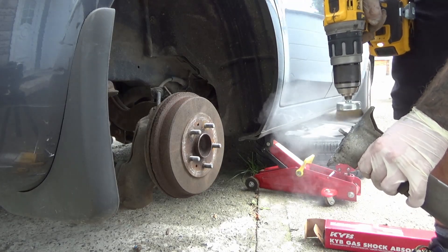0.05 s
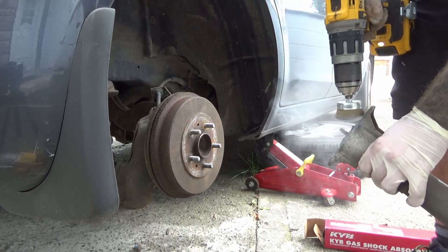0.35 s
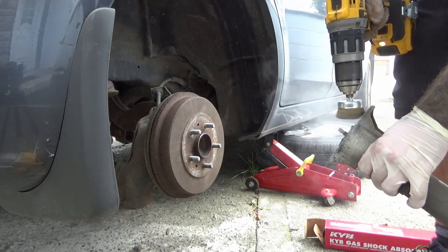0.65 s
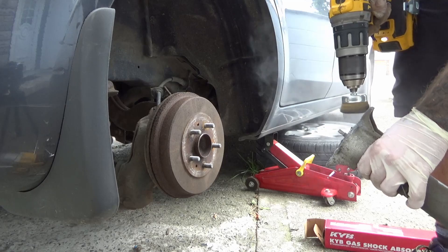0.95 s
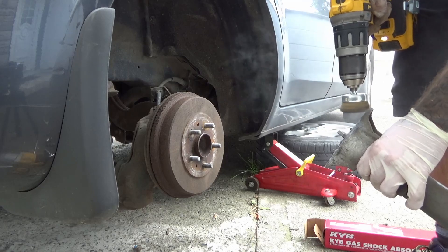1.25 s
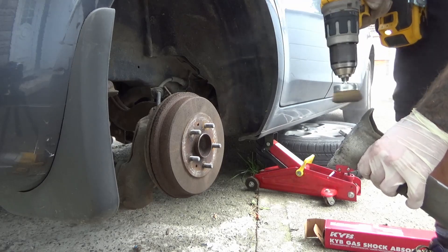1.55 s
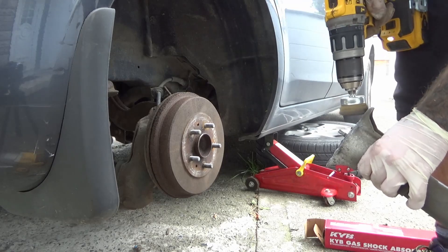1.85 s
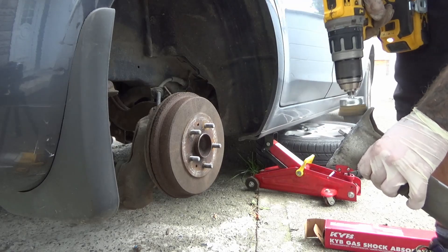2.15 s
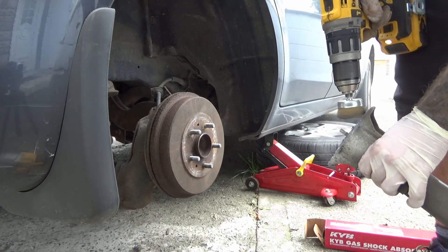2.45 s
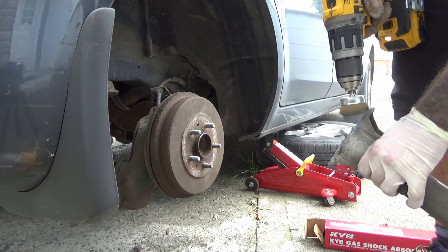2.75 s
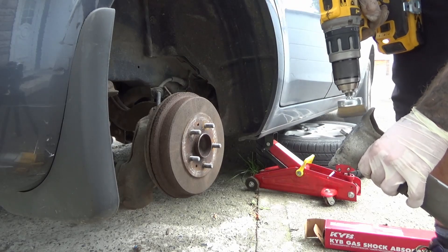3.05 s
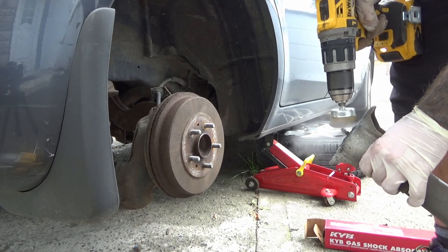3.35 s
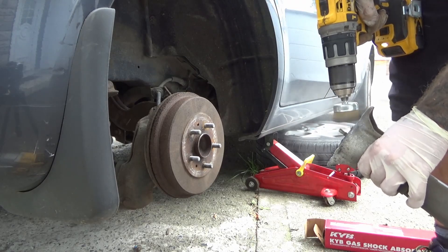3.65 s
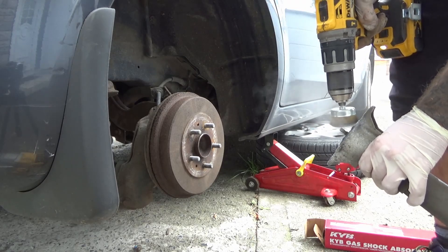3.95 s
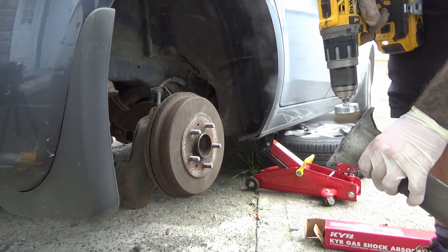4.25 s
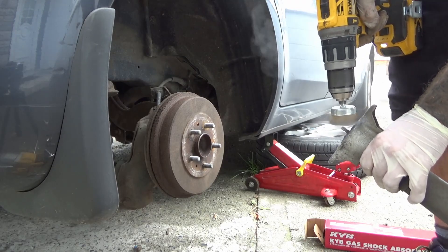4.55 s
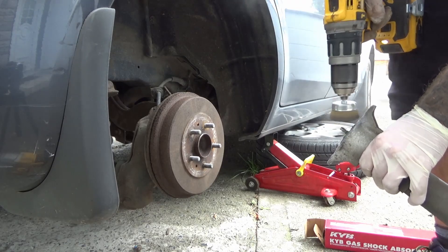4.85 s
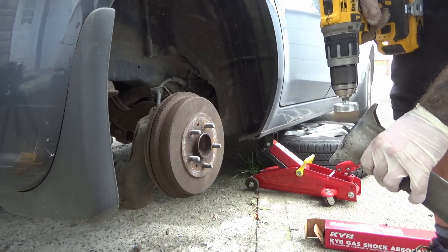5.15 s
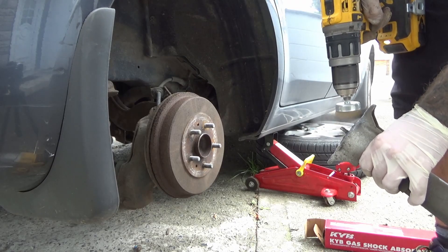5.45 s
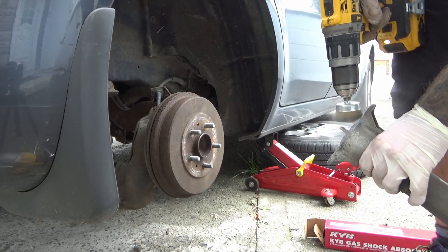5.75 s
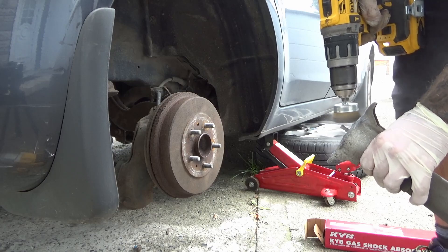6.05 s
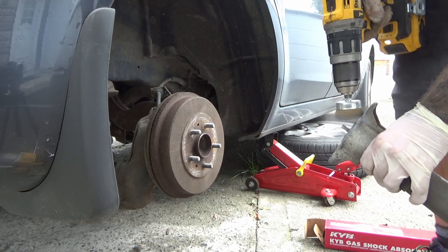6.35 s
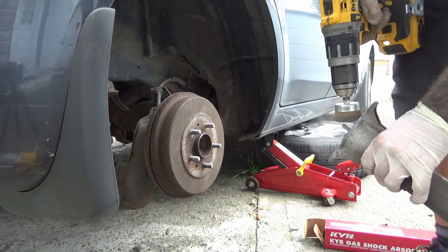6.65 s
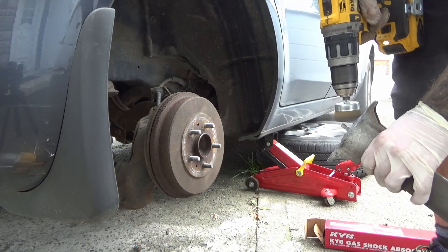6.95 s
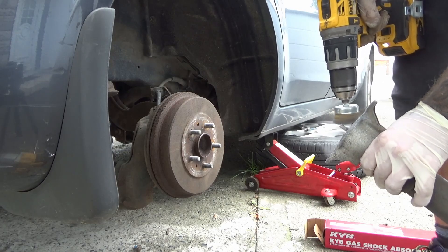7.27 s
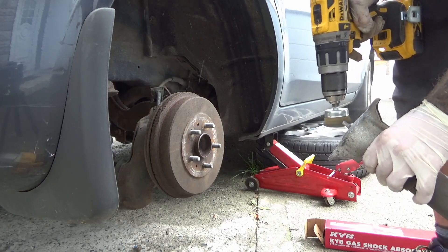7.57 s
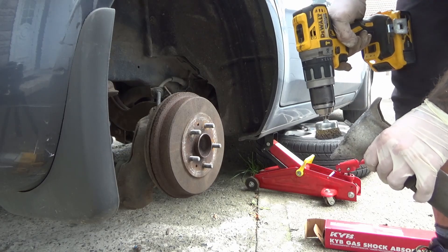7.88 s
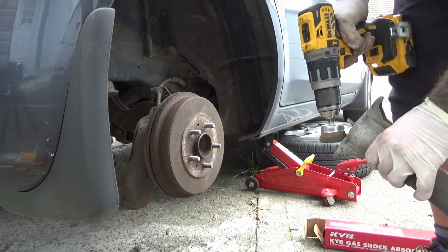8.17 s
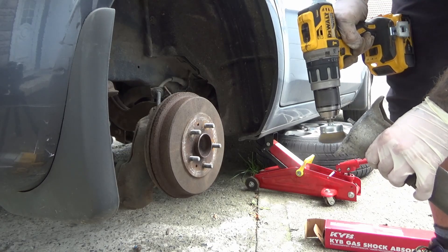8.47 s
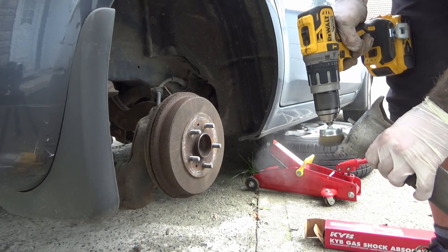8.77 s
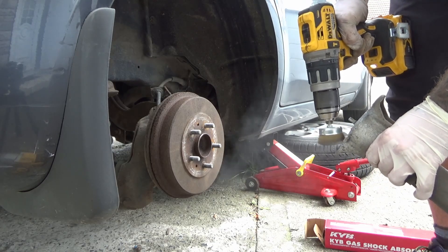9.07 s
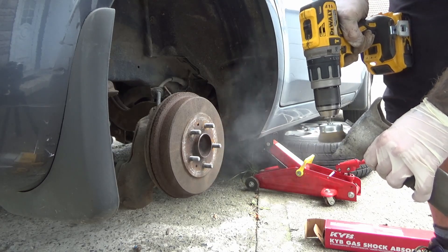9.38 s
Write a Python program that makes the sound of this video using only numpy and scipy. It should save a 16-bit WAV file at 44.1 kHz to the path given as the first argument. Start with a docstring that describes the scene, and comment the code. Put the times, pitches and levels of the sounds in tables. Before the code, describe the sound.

From the start, a cordless drill spins a wire brush against a steel strut, close by and outdoors. The sound is a dense, harsh scrubbing hiss with a metallic ring, topped by a high gear whine and thinner motor tones. The whine flutters, swelling as pressure eases and weakening as the brush presses harder, over a very faint low hum. Around 1.6 seconds the pressure lightens and the hiss shifts slightly in colour, then the scrubbing carries on steadily. At about 7.6 seconds the drill brakes with a short gear rattle and the hiss dies away, leaving a faint outdoor rumble. Small trigger clicks come from about 8.1 seconds, then a sharp clack at 8.2 as the motor quickly spins up with a brief chatter. The brush bites again at once, and the hiss and whine continue, slightly changed in tone, until about 9.6 seconds.

```python
"""Wire brush on a steel strut

A cordless drill scrubs a rusty strut with a wire cup brush, outdoors beside a car. Thousands of
wire impacts a second excite the resonances of the metal; the gears whine at their meshing
frequency and waver under the load. The drill brakes, is turned in the hand, and starts again
with a clack half a second later."""
import sys
import numpy as np
from scipy import signal
from scipy.fft import rfft, irfft, next_fast_len
from scipy.io import wavfile
from scipy.ndimage import uniform_filter1d

SR = 44100
rng = np.random.default_rng(int(sys.argv[2]) if len(sys.argv) > 2 else 0)


def generate_wav(signal):
    """Clip the signal to [-1, 1] and save it as 16-bit WAV at the path in sys.argv[1]."""
    frames = np.transpose(np.atleast_2d(signal))
    scaled = np.clip(frames, -1, 1) * 32767
    pcm = np.round(scaled).astype(np.int16)
    wavfile.write(sys.argv[1], SR, pcm)


N = 424241
T = np.arange(N) / SR
HZ = np.fft.rfftfreq(2 * next_fast_len(N // 2 + 2048), 1 / SR)

GEARING = 15.2  # shaft turns per turn of the brush
STALL_S, RESTART_S, BITE_S = 7.657, 8.205, 8.238  # the brush stalls, the motor restarts, the wires bite
# Force of the brush on the metal. Each row: time in seconds, pressure from 0 to 1.
PRESSURE = [(0, .55), (.65, .42), (.95, .85), (1.4, .85), (1.58, .05), (1.72, .2), (1.95, .8), (2.7, .9),
            (2.9, .55), (3.1, .9), (3.9, .45), (4.4, .88), (4.95, .42), (5.1, .95), (5.5, .72), (7.4, .75),
            (7.58, .25), (9.62, .33)]
# The two times, in seconds, at which the hand changes its hold on the drill.
HOLD_CHANGES = [1.65, 8.0]


def amp(db):
    """Amplitude grows tenfold for every 20 dB."""
    return 10 ** (np.asarray(db) / 20)


def unit(x):
    """Normalisation to an rms of 1."""
    return x / np.sqrt(np.mean(x ** 2) + 1e-20)


def curve(rows):
    """Linear interpolation of (seconds, value) rows at every sample."""
    return np.interp(T, *np.transpose(rows))


def ramp(start, length):
    """Linear rise from 0 to 1 over length seconds."""
    return np.clip((T - start) / length, 0, 1)


def decay(start, t60):
    """Exponential decay: 1 until start, then 60 dB down every t60 seconds."""
    return amp(-60 * np.maximum(T - start, 0) / t60)


def spectrum(points):
    """Interpolation of (Hz, value) rows on a logarithmic frequency axis."""
    hz, value = np.transpose(points)
    return np.interp(np.log(HZ + 1), np.log(hz + 1), value)


def shape(x, gain):
    """Filtering as multiplication of the spectrum by a gain."""
    size = 2 * (len(HZ) - 1)
    return irfft(rfft(x, size) * gain, size)[..., :N]


def bell(hz, width):
    """Lorentzian resonance curve, 1 at its centre."""
    return 1 / (1 + (2 * (HZ - hz) / width) ** 2)


def wander(hz, width):
    """Band-limited noise: random motion of rms 1 at rates around hz."""
    return unit(shape(rng.standard_normal(N), bell(hz, width)))


def coloured_noise(colour):
    """Spectral shaping of two independent white noises by (Hz, dB) rows, to rms 1."""
    return unit(shape(rng.standard_normal((2, N)), amp(spectrum(colour))))


def ears(pair):
    """Interaural coherence: two unrelated signals mix into a nearly alike left and right."""
    # Likeness of the two ears. Each row: frequency in Hz, coherence from 0 to 1.
    likeness = [(400, 1), (560, .96), (1400, .94), (2800, .9), (5500, .93), (9000, .87), (11000, .96),
                (13000, 1)]
    # Interaural level difference. Each row: frequency in Hz, left minus right in dB.
    balance = [(350, 0), (700, -.7), (1400, -1.1), (2800, -3.1), (5500, -2.1), (9000, -.7), (12000, 0)]
    coherence, lean_db = np.clip(spectrum(likeness), 0, 1), spectrum(balance)
    mid = shape(pair[0], np.sqrt((1 + coherence) / 2))
    side = shape(pair[1], np.sqrt((1 - coherence) / 2))
    return np.array([shape(mid + side, amp(lean_db / 2)), shape(mid - side, amp(-lean_db / 2))])


def air(level_db=-61.5, pause_rise_db=11.5, fade_s=.073):
    """Ambient noise: a low outdoor rumble; the background rises while the drill rests."""
    # Spectrum of the air. Each row: frequency in Hz, relative level in dB.
    colour = [(15, -33), (25, -3.5), (103, -9), (139, -7), (243, -13), (286, -13.5), (309, -15.5),
              (383, -14.5), (529, -15.5), (3730, -30.5), (15000, -50)]
    resting = ramp(STALL_S, fade_s) - ramp(BITE_S, fade_s)
    return coloured_noise(colour) * amp(level_db + pause_rise_db * resting)


def bumps(level_db=-8, rise_s=.015, t60=.25):
    """Damped low resonance: the strut jolts softly in the hand that holds it."""
    # Dull jolts. Each row: start in seconds, relative level in dB.
    jolts = [(4.756, -45), (4.907, -43)]
    thud = unit(shape(rng.standard_normal(N), bell(hz=215, width=70) ** 2))
    return thud * sum(amp(db + level_db) * ramp(s, rise_s) * decay(s + rise_s, t60) for s, db in jolts)


def clicks():
    """Impact transients: the trigger clicks and the gears clack as they take up slack."""
    # Each row: start in seconds, level in dB, t60 in seconds, knock relative to snap in dB.
    impacts = [(8.066, -57, 0.5, -12), (8.141, -52, .08, -12), (8.157, -41, .05, -13),
               (8.167, -37, 0.051, -6), (8.202, -36, .04, -15), (8.21, -33, 0.044, -18),
               (8.222, -23, 0.065, 2)]
    # Spectra of the bright snap and the duller knock. Each row: frequency in Hz, relative level in dB.
    snap_colour = [(300, -31), (1500, -10), (3050, 1), (4600, 1), (7200, -1), (10000, -9), (15000, -24)]
    knock_colour = [(100, -30), (400, -13), (1100, 4), (2800, -3), (5000, -16), (12000, -30)]
    snap, knock = coloured_noise(snap_colour), coloured_noise(knock_colour)
    return sum((T >= s) * amp(db) * decay(s, t60) * (snap + amp(knock_db) * knock)
               for s, db, t60, knock_db in impacts)


def rattle(chatter_db=3):
    """Backlash: loose teeth excite the modes of the gear case as the motor brakes or speeds up."""
    # Modes of the case. Each row: frequency in Hz, width in Hz, relative level in dB.
    case_modes = [(1100, 220, -7.5), (3800, 740, -2), (7100, 550, -6)]
    # Bursts of chatter. Each row: start in seconds, rise in seconds, peak in dB, t60 in seconds.
    bursts = [(7.5, .162, -22.5, .14), (8.195, 0.063, -19.5, .21)]
    response = sum(amp(db) * bell(hz, width) for hz, width, db in case_modes)
    chatter = rng.standard_normal((2, N)) * amp(chatter_db * wander(80, 150))
    level = sum(amp(db) * ramp(s, rise) ** 2 * decay(s + rise, t60) for s, rise, db, t60 in bursts)
    return unit(shape(chatter, response)) * level


def drag():
    """Friction: the snagging of the wires grows with pressure, up to a limit."""
    return np.minimum(.5 + curve(PRESSURE), 1.1)


def motor(brake_s=7.578, spin_up_s=.115, overshoot=.033, settle_s=.04, sway_depth=.0043):
    """Speed (1 = full) and its integral, the shaft turns, which waver under the drag of the load."""
    # Shaft speed under full trigger. Each row: time in seconds, rotation rate in Hz.
    shaft_hz = [(0, 410), (2.4, 409.2), (4, 409.3), (5.5, 410.4), (7.6, 410.2), (9.2, 409.7)]
    braking = 1 - ramp(brake_s, length=.125) ** 1.6  # slows ever faster to a halt
    excess = overshoot * np.exp(-np.maximum(T - RESTART_S - spin_up_s, 0) / settle_s)
    speed = braking + ramp(RESTART_S, spin_up_s) ** 1.35 * (1 + excess)
    sway = sway_depth * unit(wander(13, 14) + .9 * wander(33, 12))
    turns = np.cumsum(curve(shaft_hz) * speed * (1 + drag() * sway)) / SR
    return speed, turns


def shudder(speed, turns, waver_db=3.5, level_db=.3, restart_db=-6):
    """Rotating unbalance: the brush shakes the strut, less so in the grip after the restart."""
    # Harmonics of the shaking. Each row: multiple of the brush speed, relative level in dB.
    harmonics = [(1, -8), (3, -3.5), (5, -0.5), (9, -0.5)]
    # Strength of the shaking. Each row: time in seconds, relative level in dB.
    strength = [(0.0, -70), (0.14, -65), (1.08, -63), (1.54, -82), (2.09, -63), (5.63, -73), (7.2, -68.5)]
    phase = 2 * np.pi * turns / GEARING
    hum = sum(amp(db) * unit(amp(waver_db * wander(2, 8))) * np.sin(order * phase)
              for order, db in harmonics)
    level = amp(level_db + curve(strength) + restart_db * (T > RESTART_S))
    return np.sqrt(2) * hum * level * speed ** 2


def motor_tones(speed, turns, flutter_db=2):
    """Rotational harmonics: thin tones of the shaft that stand out only near full speed."""
    # Each row: multiple of the shaft speed, full-speed level in dB before the pause and after it.
    harmonics = [(1, -62, -66), (2, -57, -60), (4, -41, -44), (5, -46, -50), (8, -34.6, -30.5),
                 (9, -45, -42), (16, -42.5, -45)]
    tones = 0
    for order, before_db, after_db in harmonics:
        level = amp(np.where(T < HOLD_CHANGES[1], before_db, after_db))
        flutter = unit(amp(flutter_db * wander(5, 30)))
        tones += level * flutter * np.sin(2 * np.pi * order * turns)
    return np.sqrt(2) * tones * speed ** 4


def gear_whine(speed, turns, teeth=23, free_db=-21.9, pressed_db=-8.5, flutter_db=3.5):
    """Gear meshing: a tone at the tooth rate, which pressure weakens and sets fluttering."""
    flutter = amp(flutter_db * drag() * wander(16, 70))
    flutter /= np.sqrt(uniform_filter1d(flutter ** 2, size=SR // 4))  # keeps the mean power steady
    # the short waves reach the two ears with drifting differences of phase and level
    sides = np.array([[1], [-1]])
    drift_rad = .27 * wander(2, 15) * sides
    drift_db = .7 * wander(.5, 2) * sides
    mesh = np.sqrt(2) * np.sin(2 * np.pi * teeth * turns + drift_rad)
    level = amp(free_db + pressed_db * curve(PRESSURE) + drift_db)
    fade_in = np.interp(speed, (.62, .8), (0, 1))
    roughness = 1 + .2 * wander(100, 400)
    return level * fade_in * flutter * roughness * mesh


def wheel_arch(x, echo_db=-16, t60=.1):
    """Interference: dense short reflections from the car and the paving ripple the spectrum finely."""
    t = np.arange(SR // 10) / SR
    taps = rng.standard_normal(len(t)) * (t > .002) * amp(-60 * t / t60)
    echoes = signal.fftconvolve(x, taps[None] / np.linalg.norm(taps), axes=1)[:, :N]
    return x + amp(echo_db) * echoes


def wire_flicks(turns, flicks_per_s=12000, spread_db=2.5, wash=.76, snag_db=.26, patchy_db=.55):
    """Shot noise: wire tips strike at random over a wash of hiss, surging with each brush turn."""
    sizes = amp(spread_db * np.minimum(rng.exponential(1, (2, N)), 4)) * rng.choice([-1, 1], (2, N))
    strikes = rng.random((2, N)) < flicks_per_s / SR
    flicks = unit(sizes * strikes) + wash * rng.standard_normal((2, N))
    surge = .025 * np.sin(2 * np.pi * turns / GEARING)
    buzz = .036 * np.sin(2 * np.pi * turns * 3 / 4)
    flicks *= (1 + surge + buzz) * amp(snag_db * wander(60, 60))
    # as the contact point roams, broad regions of the spectrum swell and fade apart
    roaming = sum(shape(flicks, bell(hz, hz / 4)) * wander(1.5, 24)
                  for hz in np.geomspace(1000, 12000, num=8))
    return flicks + (amp(patchy_db) - 1) * roaming


def resonances(flicks, crossfade_s=.2):
    """Source and filter: strut, brush and wheel arch colour the flicks differently in each hold."""
    # Spectrum of one flick. Each row: frequency in Hz, relative level in dB.
    flick_colour = [(90, -37), (200, -26.5), (400, -23), (600, -14), (900, -4), (1500, -8), (3000, -3),
                    (4500, -2.5), (7000, -0.5), (8800, 1), (10000, -7), (12000, -11), (13700, -13),
                    (15500, -19.5)]
    # Narrow ringing tones in the scrubbing hiss, several of them from the drill's motor.
    # Each row: frequency in Hz, width in Hz, gain in dB.
    narrow_tones = [(305.5, 14, 8.5), (754, 16, 2.5), (1151, 20, 1.5), (3130, 30, 5), (6576, 36, 5)]
    # Peaks and hollows. Each row: frequency in Hz, width in Hz, gain in dB for each of three holds.
    body = [(791, 33.4, -17, -12.5, -15), (936, 56, -1.5, -3.5, -5.5), (1146, 120, 0.5, 1, 1.5),
            (1354, 52, -4.5, -6.5, -10), (1520, 256, 5.5, 6, 6.5), (1684, 66, -12.5, -9.5, 0),
            (1863, 160, 6, 6, 2), (2067, 138, 7, 7.5, 7.5), (2370, 74, -2, -5, 0),
            (2700, 195, -1, -1.5, 4.5), (2984, 150, 3.5, 3.5, 3), (3440, 450, 0.9, 2.5, 4.5),
            (4470, 430, -1.1, -0.5, 3.5), (4830, 880, 3, 3, -1.6), (5580, 650, -3, -4.5, -3.3),
            (6150, 350, 0, -1.6, 2), (7050, 400, 2.5, 1.5, 3.5), (7780, 320, -0.5, -0.5, -7.5),
            (7850, 380, -2.5, -1, 4), (8800, 350, -2.5, -2.5, -1.5), (11200, 3200, -0.5, -1, 1.5)]
    # Relative strength of the scrubbing in each hold, in dB.
    hold_db = [-1.13, -0.19, -0.04]
    steady_db = spectrum(flick_colour) + sum(db * bell(hz, width) for hz, width, db in narrow_tones)
    first, second = (np.clip((T - s) / crossfade_s + .5, 0, 1) for s in HOLD_CHANGES)
    ringing = 0
    for hold, share in enumerate([1 - first, first - second, second]):
        colour_db = steady_db + sum(dbs[hold] * bell(hz, width) for hz, width, *dbs in body)
        ringing += share * amp(hold_db[hold]) * unit(shape(flicks, amp(colour_db)))
    return ringing


def strut_ring(scrub, free_db=-.9, pressed_db=3, fade_db_per_s=-.27):
    """The strut's main resonance grows with pressure and weakens as the brush works along the metal."""
    ring_db = free_db + pressed_db * curve(PRESSURE) + fade_db_per_s * T
    return scrub + shape(scrub, bell(hz=2030, width=310)) * (amp(ring_db) - 1)


def brush(turns, level_db=-18, yard_echo_db=-33, bite_rise_s=.018):
    """Forced vibration: the scrubbed steel sounds until the stall, dies away, and returns at the bite."""
    flicks = wheel_arch(wire_flicks(turns))
    scrub = strut_ring(resonances(flicks))
    stall = decay(STALL_S, t60=.085) + amp(yard_echo_db) * decay(STALL_S, t60=.9)
    bite = 1 - np.exp(-np.maximum(T - BITE_S, 0) / bite_rise_s)
    return scrub * amp(level_db) * (stall + bite)


def scene():
    """Superposition of all sources; one motor drives the brush, the tones and the shudder."""
    speed, turns = motor()
    noises = ears(brush(turns) + rattle() + clicks() + air())
    return noises + gear_whine(speed, turns) + motor_tones(speed, turns) + shudder(speed, turns) + bumps()


def record(dry, edge_hz=15750):
    """Band limiting: a steep low-pass filter removes the highest treble."""
    taps = signal.firwin(511, edge_hz, window=("kaiser", 9), fs=SR)
    return signal.oaconvolve(dry, taps[None], "same")


dry = scene()
out = record(dry)
generate_wav(out)
```